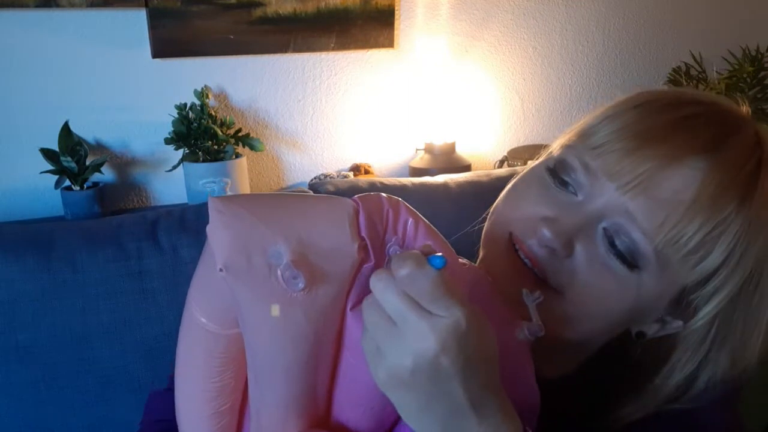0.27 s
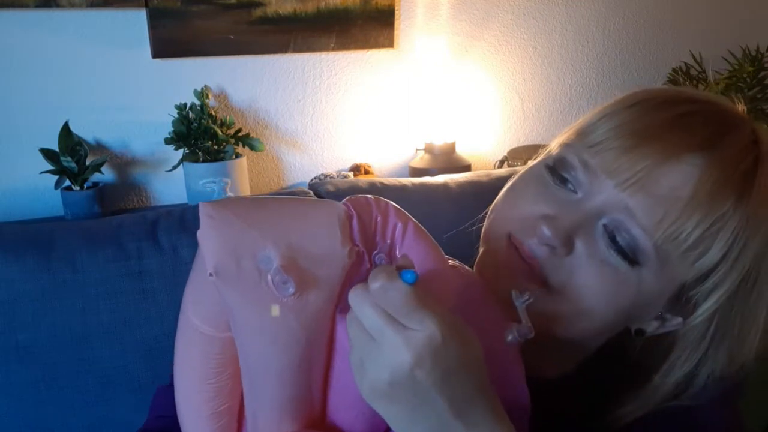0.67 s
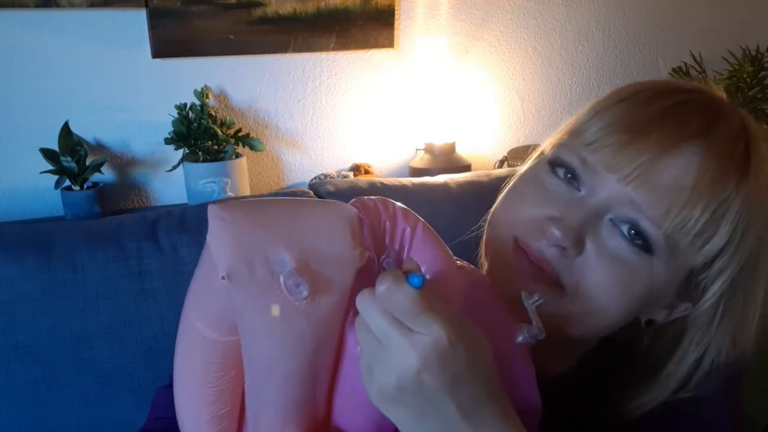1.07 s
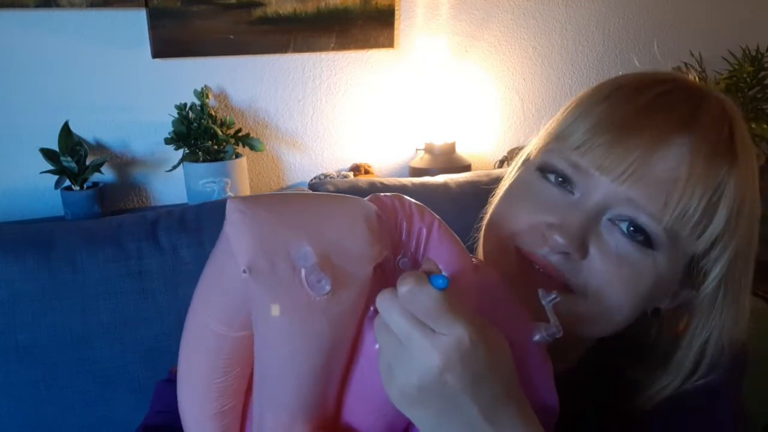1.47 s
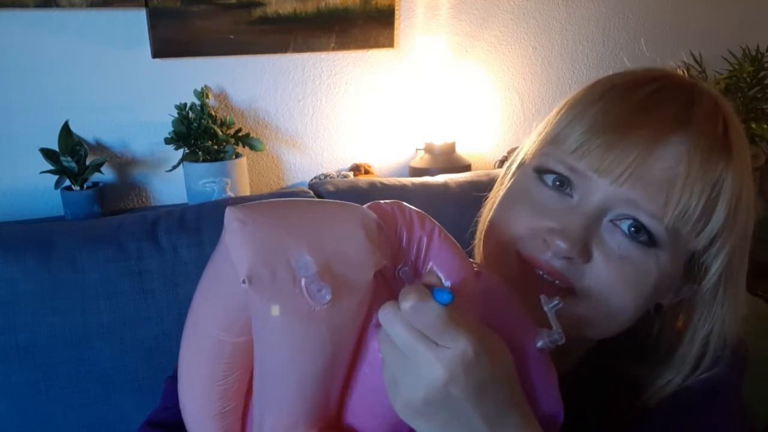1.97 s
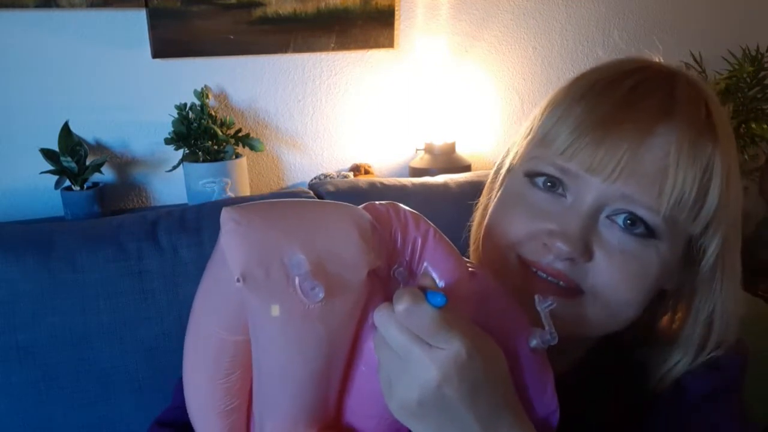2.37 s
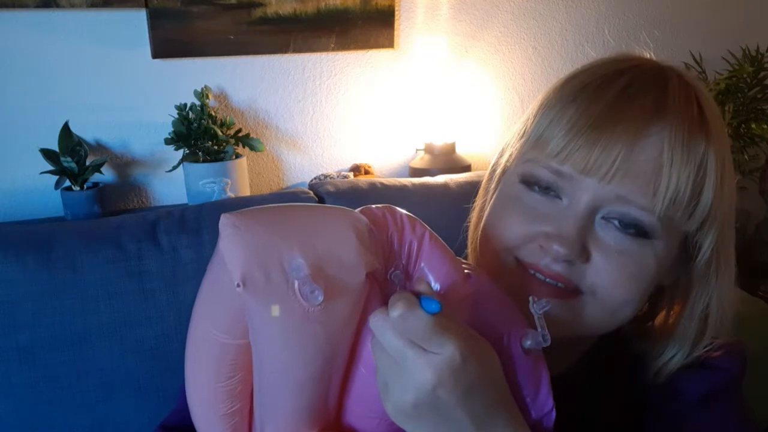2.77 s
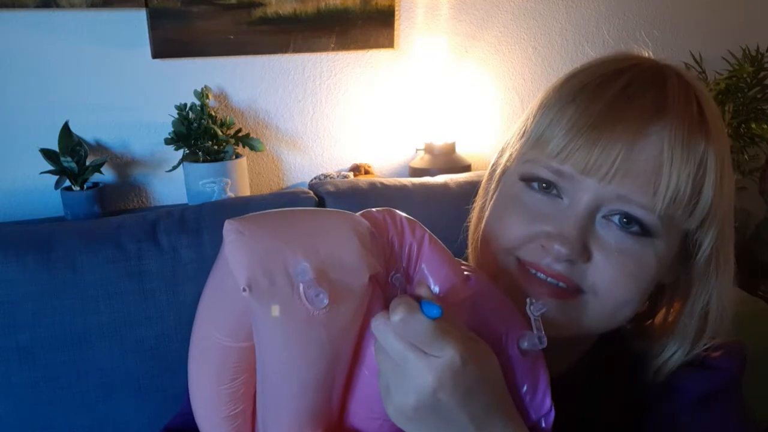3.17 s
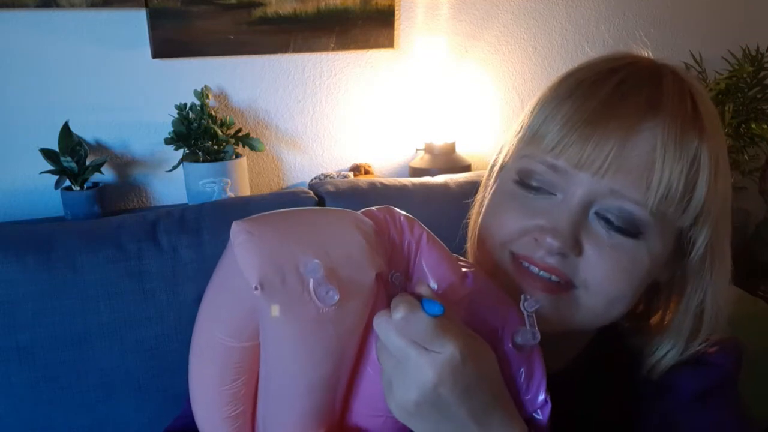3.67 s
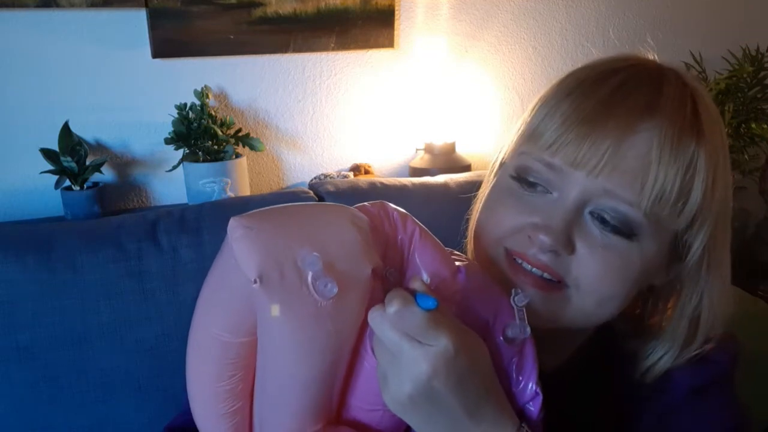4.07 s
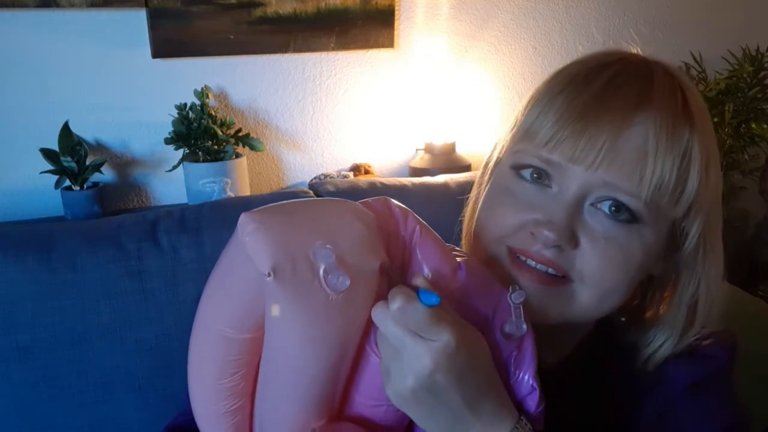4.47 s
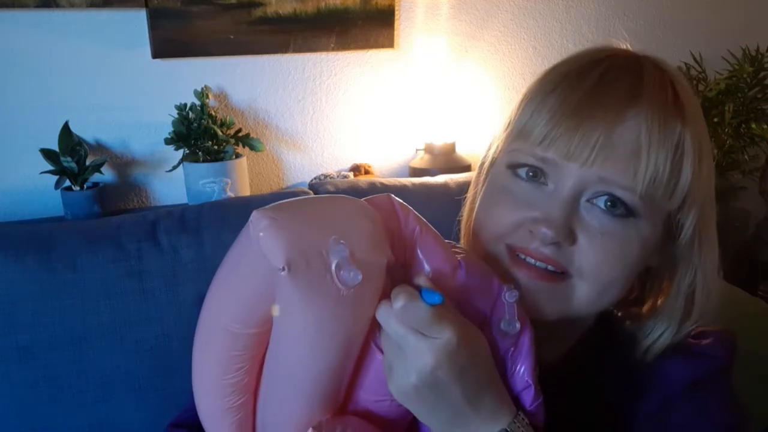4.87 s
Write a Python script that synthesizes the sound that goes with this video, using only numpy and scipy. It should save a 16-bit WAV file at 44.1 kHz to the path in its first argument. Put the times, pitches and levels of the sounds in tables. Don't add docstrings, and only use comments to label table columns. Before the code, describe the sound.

A steady, breathy stream of air escapes an inflatable's small valve indoors, rising, turning faintly whistly, then fading without ever stopping.

```python
import sys
import numpy as np
from scipy import signal
from scipy.fft import rfft, irfft
from scipy.io import wavfile
from scipy.ndimage import uniform_filter1d

SR = 44100
rng = np.random.default_rng(int(sys.argv[2]) if len(sys.argv) > 2 else 0)


def how_loud(loudness_db):
    steps = np.asarray(loudness_db, float) / 20
    return 10 ** steps


def master_out(mix):
    frames = np.transpose(np.atleast_2d(mix))
    ceiling = np.clip(frames, -1, 1)
    pcm = np.round(ceiling * 32767).astype(np.int16)
    wavfile.write(sys.argv[1], SR, pcm)


N = 225542

# time_s, jet_db, neck_db (against the jet), neck_hz, brightness_db_per_octave
GRIP = [(0, -42.5, -6, 1850, 0.5), (.25, -43.5, -4.5, 1970, 0.5), (.6, -41.5, -5, 1860, 0.5),
        (.9, -39.5, -5.5, 1890, 0.3), (1.25, -37, -3.5, 1810, -1.5), (1.6, -34.5, -4.5, 1760, -3),
        (1.9, -35, -4, 1870, -2), (2.2, -35.5, -0.3, 1800, -1.3), (2.48, -36, -1.5, 1800, -3.5),
        (2.8, -38, -5.5, 2000, -2.5), (3.2, -38, -4, 2010, -2.5), (3.5, -39, 0, 1900, -0.9),
        (3.9, -38, -2.9, 1930, -1.1), (4.2, -40, -3, 1990, -1.4), (4.5, -42, -3.5, 1620, -0.6),
        (5.11, -43.5, -6.5, 1770, -2.5)]
# centre_s, length_s, pitch_hz, level_db
WHISTLES = [
    (2.49, 0.16, 1430, -46),
    (1.526, 0.38, 1864, -43.5),
    (2.0, .6, 1840, -41),
    (3.8, 1.3, 1910, -50),
    (2.89, 0.62, 3520, -43),
]
# freq_hz, density_db (per Hz)
LIP_COLOUR = [(1600, -36.5), (2400, -10.5), (3000, 2.85), (4000, -7.5), (5200, -15), (8000, -13.5),
              (11000, -11), (15500, -12.5)]
# freq_hz, density_db (per Hz)
SKIN_COLOUR = [(130, -50), (220, -28.5), (324, -13), (466, -11), (566, -4.5), (719, -3.5), (1240, -5),
               (1400, -3.5), (1820, -35), (3080, -120)]
# centre_s, length_s, change_db
SKIN_SHUDDERS = [
    (.16, 0.15, 4.5),
    (0.38, 0.23, -2.5),
    (0.552, 0.066, 7.5),
    (0.766, 0.47, -5),
    (1.71, 0.36, -5),
    (2.495, 0.32, 7),
    (3.19, 0.5, -3),
    (3.9, 0.65, -1.5),
    (4.602, 1, 3.5),
]
# freq_hz, pose1_rad, pose2_rad, pose3_rad
PORT_LEAD = [(3560, .82, .62, .48), (4900, 2.55, 1.97, 1.87), (6440, .9, -.06, -.13),
             (7600, 3.4, 1.26, 2.4), (7900, 4.0, 5.5, 1.9), (11500, 4.8, 6.45, 4.1), (11900, 5.3, 8.7, 4.9),
             (14480, 4.7, 10.4, 12.3)]
POSE_TIMES = [
    1.5,
    1.95,
    3.1,
    4.4,
]
# centre_s, length_s, delay_ms, phase_turns, share_of_direct
LEFT_REFLECTORS = [(0.96, 2.2, 0.091, 0.24, 0.74), (1.17, 2, 0.325, -0.1, 0.29),
                   (1.26, 1.6, 0.081, -0.39, 1.38), (1.73, 2.8, 0.38, -0.05, 0.62),
                   (2.0, 4.7, 0.536, 0.048, 0.26), (2.15, 1.87, 0.15, -0.061, 0.66),
                   (2.28, 1.4, 0.211, -0.16, 0.57), (4.23, 0.79, 0.445, -0.27, 0.29),
                   (4.65, 1.5, 0.327, -0.32, 0.5), (4.89, 1.2, 0.544, 0.084, 0.28)]
# centre_s, length_s, delay_ms, phase_turns, share_of_direct
RIGHT_REFLECTORS = [(1.14, 5, 0.12, 0.47, 0.71), (2.07, 5, 0.1082, -0.22, 0.96),
                    (2.53, 2.8, 0.374, -0.2, 0.31), (3.11, 1.1, 0.257, -0.14, 0.47),
                    (3.47, 2.4, 0.795, 0.054, 0.13), (3.93, 3.8, 0.214, -0.32, 0.41),
                    (4.21, 2.3, 0.66, 0.32, 0.15), (4.54, 2.4, 0.478, -0.33, 0.13),
                    (4.89, 8.9, 0.338, -0.35, 0.28), (5.04, 3.9, 0.564, 0.32, 0.31)]
# left_ms, right_ms, level_db
REFLECTIONS = [
    (6.76, 6.72, -16.5),
    (2, 1.143, -19.5),
    (4.8, 3.05, -26.5),
    (7.9, 5.7, -53),
    (13.5, 16, -14.5),
]
# freq_hz, t60_s
ROOM_DECAY = [(200, 0.09), (1000, 0.54), (4000, 0.61), (10000, 0.073), (16000, 0.074)]
# freq_hz, level_db
ROOM_LEVEL = [(200, -16), (1000, -3), (3000, -5.5), (6000, -5.5), (12000, 2)]
# freq_hz, density_db (per Hz)
HUM_COLOUR = [(20, -26), (50, -10), (80, -10.5), (100, 3.5), (122, -7.5), (160, -1.5), (210, -9.5),
              (320, -1), (600, -15), (1000, -34)]


def evened(x):
    return x / np.sqrt(np.mean(x ** 2) + 1e-20)


def read(points, hz):
    f, value = np.transpose(points)
    return np.interp(np.log(hz + 1), np.log(f + 1), value)


def curve(rows):
    s, *columns = np.transpose(rows)
    return [np.interp(np.arange(N) / SR, s, column) for column in columns]


def bump(t, centre_s, length_s):
    return np.exp(-(2 * (t - centre_s) / length_s) ** 2)


def smoothed(x, bins, frames):
    return uniform_filter1d(uniform_filter1d(x, bins, -2), frames, -1)


def patches(shape, bins, frames):
    return evened(smoothed(rng.standard_normal(shape), bins, frames))


def flutter(size):
    return evened(uniform_filter1d(uniform_filter1d(rng.standard_normal(N), size), size))


def coloured(points):
    hz = np.fft.rfftfreq(N, 1 / SR)
    spectrum = rfft(rng.standard_normal(N)) * how_loud(read(points, hz))
    return evened(irfft(spectrum, N))


def resonate(x, hz, width_hz):
    turn = np.exp(2j * np.pi * np.cumsum(hz) / SR)
    r = np.exp(-np.pi * width_hz / SR)
    ringing = signal.lfilter([1 - r], [1, -r], x / turn)
    return 2 * (turn * ringing).real


def valve_neck(eddies, neck_hz):
    main = resonate(resonate(eddies, neck_hz, 480), neck_hz, 570)
    lower = resonate(eddies, 0.91 * neck_hz, 630)
    return 0.42 * evened(main) + 0.5 * evened(lower)


def valve_lip():
    return how_loud(2.5 + 0.5 * flutter(size=120)) * coloured(LIP_COLOUR)


def vinyl_skin(jet_db, t):
    level_db = -57.5 + (jet_db + 38.5)
    level_db += 1.09 * t
    level_db += 1.5 * flutter(size=1200)
    for centre_s, length_s, change_db in SKIN_SHUDDERS:
        level_db += change_db * bump(t, centre_s, length_s)
    return how_loud(level_db) * coloured(SKIN_COLOUR)


def neck_whistles(eddies, t):
    whistle = np.zeros(N)
    for centre_s, length_s, pitch_hz, level_db in WHISTLES:
        tone = evened(resonate(eddies, np.full(N, pitch_hz), width_hz=150))
        whistle += how_loud(level_db) * bump(t, centre_s, length_s) * tone
    return whistle


def jet():
    jet_db, neck_db, neck_hz, _ = curve(GRIP)
    t = np.arange(N) / SR
    gust_db = 0.2 * flutter(size=1500)
    eddies = coloured([(500, -34), (1000, -2), (1500, 0.5), (2150, -0.5), (2600, -2.5), (5000, -32)])
    mouth = how_loud(neck_db) * valve_neck(eddies, neck_hz) + valve_lip()
    return how_loud(jet_db + gust_db) * mouth + vinyl_skin(jet_db, t) + neck_whistles(eddies, t)


def folds(rows, hz, t):
    paths = 1
    for centre_s, length_s, delay_ms, turns, share in rows:
        phase = np.exp(-2j * np.pi * (hz * delay_ms / 1000 - turns))
        paths = paths + share * bump(t, centre_s, length_s) * phase
    return 20 * np.log10(abs(paths) + 0.02)


def hand_lead(hz, t):
    table_hz, *radians = np.transpose(PORT_LEAD)
    poses = np.transpose([np.interp(hz, np.r_[0, table_hz], np.r_[0, r]) for r in radians])
    held = [[1, 0, 0, 0], [0, 1, 1, 0], [0, 0, 0, 1]]
    return poses @ [np.interp(t, POSE_TIMES, share) for share in held]


def ports(x):
    hz, t, z = signal.stft(x, SR, nperseg=512, noverlap=384)
    lead = hand_lead(hz, t)
    strength = np.sqrt(abs(smoothed(abs(z) ** 2, 7, 41)))
    other = strength * (rng.standard_normal(z.shape) + 1j * rng.standard_normal(z.shape))
    hz = hz[:, None]
    reach = np.clip((hz - 1900) / (2400 - 1900), 0, 1)
    time_s, brightness = np.transpose(GRIP)[[0, 4]]
    bright_db = np.interp(t, time_s, brightness) * np.log2((hz + 1) / 6000)
    combs_db = np.array([folds(LEFT_REFLECTORS, hz, t), folds(RIGHT_REFLECTORS, hz, t)])
    field_db = reach * (combs_db + bright_db)
    field_db += np.array([0.3, -0.3])[:, None, None]
    field_db += 1.47 * patches((2,) + z.shape, bins=5, frames=60)
    treble = np.clip(hz / 8000, 0, 1) ** 2
    lead = lead + 0.5 * treble * patches(z.shape, bins=10, frames=200)
    apart = 0.4 * treble * other
    pair = np.array([z + apart, z - apart]) * how_loud(field_db)
    pair = pair * np.exp(0.5j * np.array([lead, -lead]))
    return signal.istft(pair, SR, nperseg=512, noverlap=384)[1][:, :N]


def walls(pair):
    taps = np.zeros((2, 1024))
    at = np.arange(1024)
    for left_ms, right_ms, level_db in REFLECTIONS:
        delay = np.array([[left_ms], [right_ms]]) * SR / 1000
        taps += how_loud(level_db) * np.sinc(at - delay)
    taps = signal.lfilter([0.55], [1, -0.45], taps)
    return signal.fftconvolve(pair, taps, axes=1)[:, :N]


def room(x):
    half = SR // 2
    taps = np.zeros((3, half))
    at = np.arange(200, half - 20, 20) + rng.integers(0, 20, (3, (half - 201) // 20))
    np.put_along_axis(taps, at, rng.choice([-1., 1.], at.shape), 1)
    hz, t, z = signal.stft(taps, SR, nperseg=256)
    same = np.exp(-hz / 1500)[:, None]
    decay = how_loud(-60 * t / read(ROOM_DECAY, hz)[:, None])
    decay *= how_loud(read(ROOM_LEVEL, hz))[:, None] / np.linalg.norm(decay, axis=1, keepdims=True)
    z = (same * z[2] + np.sqrt(1 - same ** 2) * z[:2]) * decay
    tail = signal.istft(z, SR, nperseg=256)[1] * np.sqrt(20 / 128)
    before = np.concatenate([x[:, half:0:-1], x], 1)
    return signal.fftconvolve(before, tail, axes=1)[:, half:half + N]


def hum():
    shared = coloured(HUM_COLOUR)
    pair = np.array([shared + 0.84 * coloured(HUM_COLOUR) for _ in "LR"])
    return how_loud(-72 + 1.5 * flutter(size=3000)) * pair


def scene():
    direct = ports(jet())
    return direct + walls(direct) + room(direct) + hum()


def band_limit(x):
    return signal.sosfilt(signal.butter(12, 16980, fs=SR, output="sos"), x)


def record(dry):
    low_cut = signal.butter(2, 50, "high", fs=SR, output="sos")
    thin = signal.sosfilt(low_cut, dry)
    top_cut = signal.firwin(1023, 15830, window=("kaiser", 9), fs=SR)
    thin = signal.oaconvolve(thin, top_cut[None], "same", axes=1)
    return band_limit(thin)


dry = scene()
out = record(dry)
master_out(out)
```